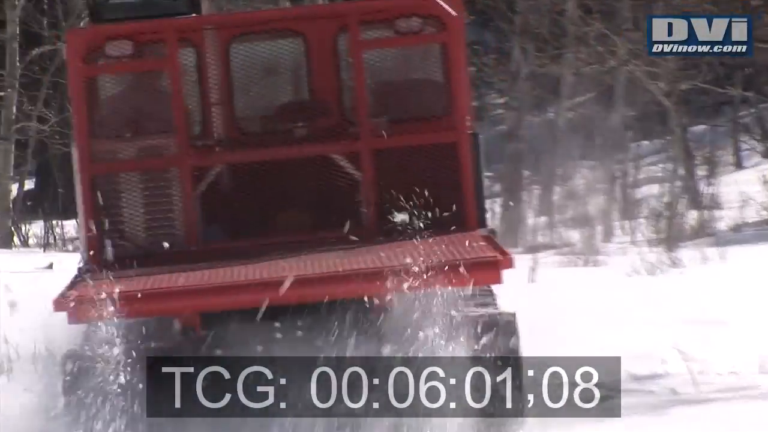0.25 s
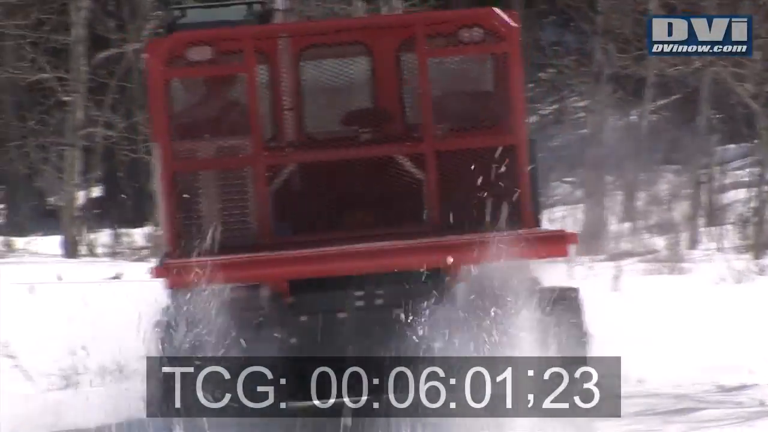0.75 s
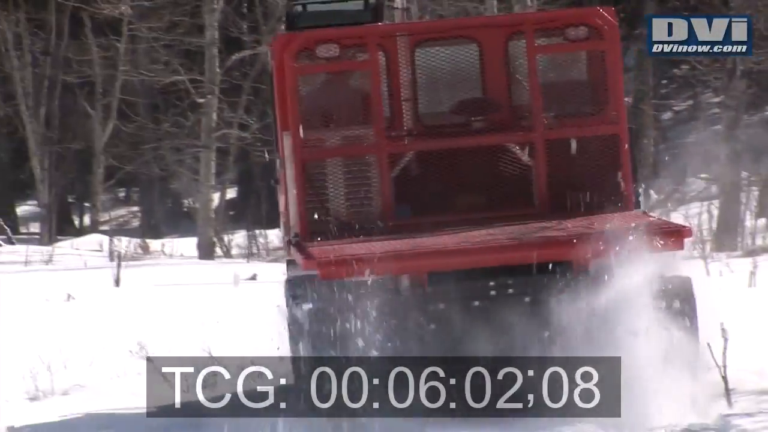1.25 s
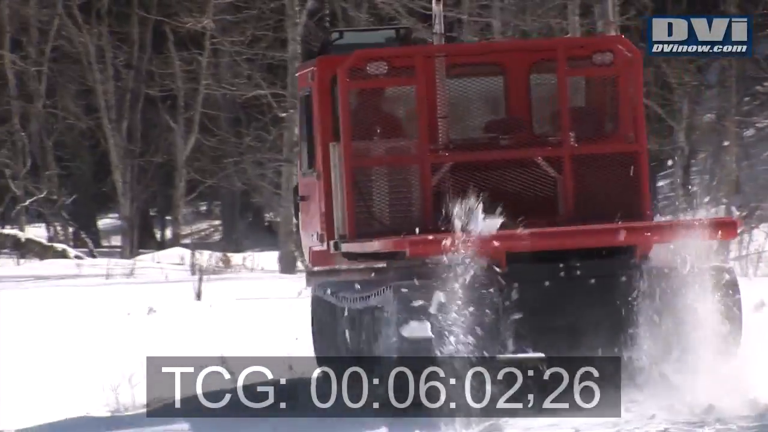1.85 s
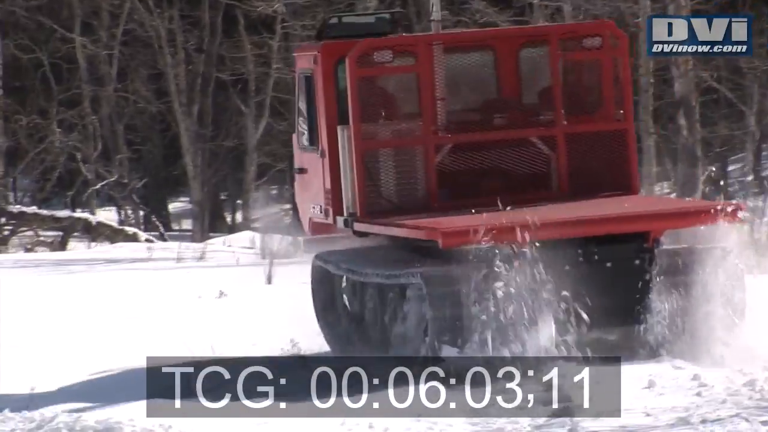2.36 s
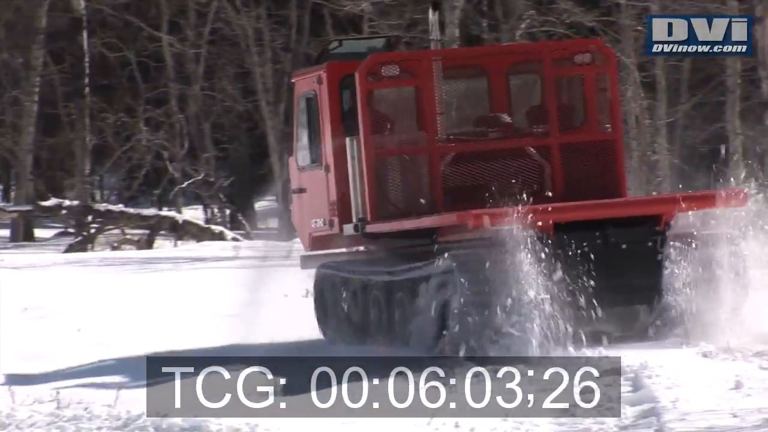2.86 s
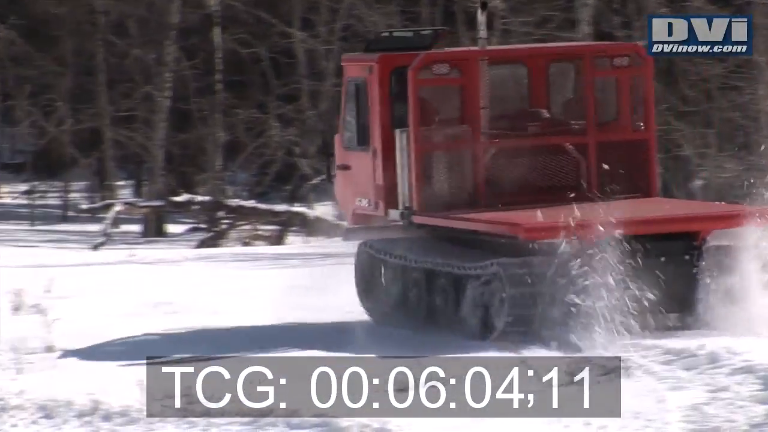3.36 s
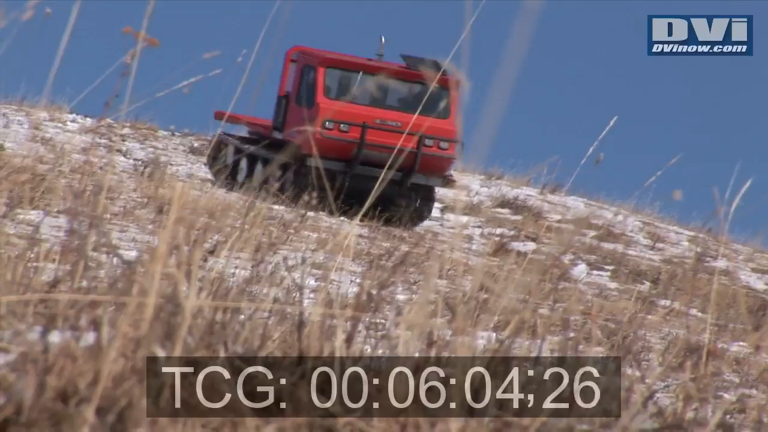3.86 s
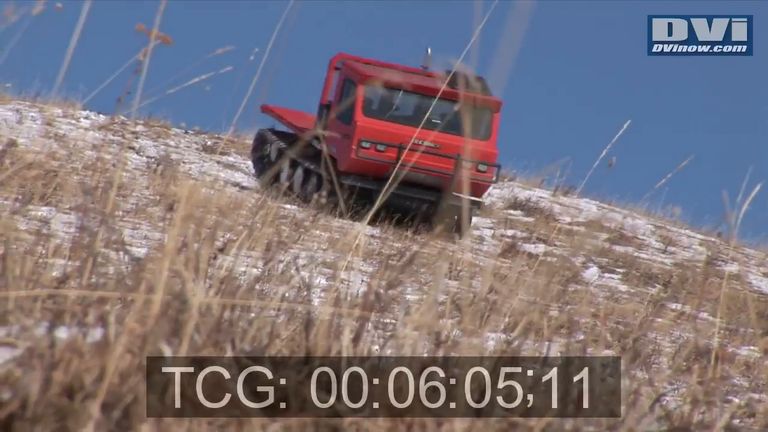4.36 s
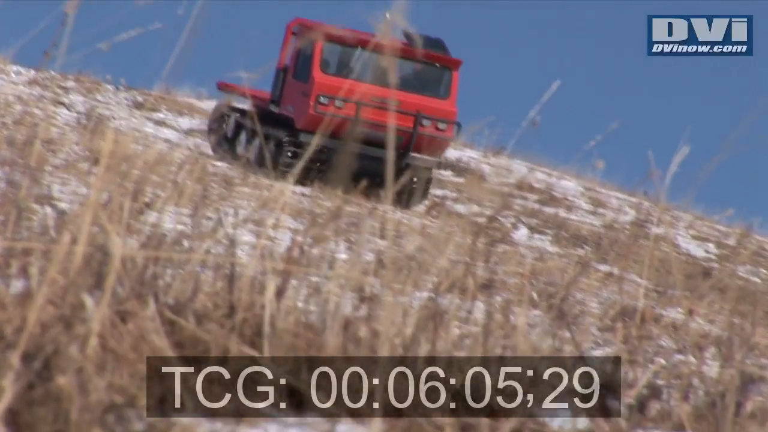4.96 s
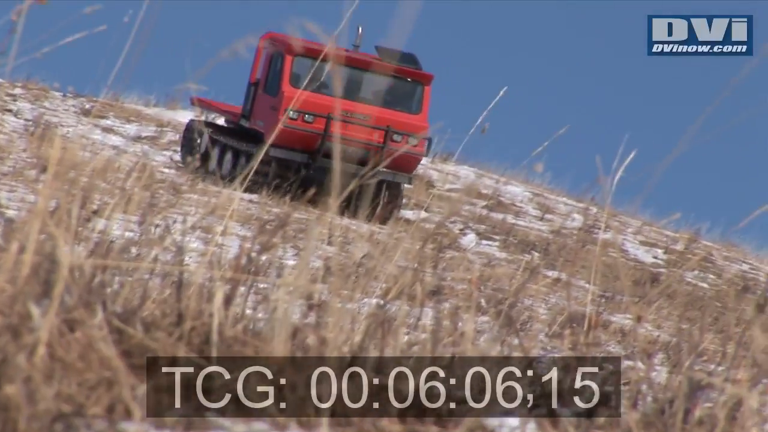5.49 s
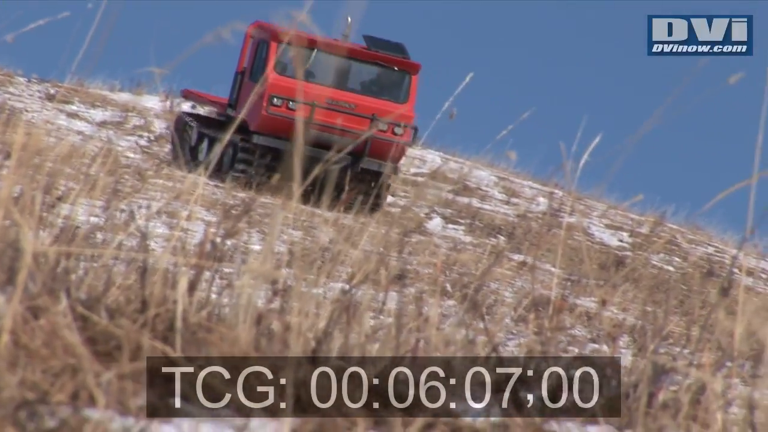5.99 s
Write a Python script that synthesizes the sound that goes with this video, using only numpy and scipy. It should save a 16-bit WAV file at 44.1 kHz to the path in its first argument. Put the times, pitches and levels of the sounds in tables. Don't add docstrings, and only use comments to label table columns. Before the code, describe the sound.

Grinding snow, throbbing low exhaust and rattling deck panels fill the near view, suddenly replaced by windy hillside air and a soft far-off engine.

```python
import sys
import numpy as np
from scipy import signal
from scipy.fft import rfft, irfft, next_fast_len
from scipy.io import wavfile
from scipy.ndimage import uniform_filter1d, map_coordinates

SR = 44100
rng = np.random.default_rng(int(sys.argv[2]) if len(sys.argv) > 2 else 0)


def unload_wav(signal):
    wavfile.write(
        sys.argv[1],
        SR,
        np.round(np.clip(np.atleast_2d(signal).T, -1, 1) * 32767).astype(np.int16),
    )


def ratio(d):
    e = np.asarray(d, float) / 20
    return 10 ** e


N = 274743
TIME = np.arange(N) / SR
CUT_S, SPLICE_S = 3.8392, 0.0008

# (frequency [Hz], density [dB per Hz])
HISS_SPECTRUM = [(200, -7), (400, -3), (1000, -3), (2000, -12.5), (2500, -35), (3700, -39), (4200, -17),
                 (7000, -22), (14400, -23.5), (14900, -24), (15600, -36)]
# (multiple of drum rate, level [dB])
DRUM_WHINE = [(4, -93), (8, -74.5), (9, -75.5), (10, -90), (14, -89), (15, -101), (16, -79), (17, -84),
              (18, -105), (19, -94), (20, -102), (21, -101), (22, -102)]
# (frequency [Hz], gain [dB])
MIC_RESPONSE = [(14800, 0), (15050, -30), (16000, -32)]

# (frequency [Hz], density [dB per Hz])
WIND_SPECTRUM = [(13, -52), (22, -17), (54, -6.5), (86, 1), (118, 0.5), (146, -6), (163, 2), (200, -9),
                 (300, -32), (390, -29), (660, -120)]
# (frequency [Hz], density [dB per Hz])
WIND_EDGE_SPECTRUM = [(190, -17), (240, 8.5), (350, -1.5), (500, -13), (700, -52)]
# (frequency [Hz], density [dB per Hz])
FAR_TRACK_SPECTRUM = [(500, -23), (860, -14), (1200, -9), (1420, -12), (1560, -4), (1800, -7), (2150, -0.5),
                      (2550, -5.5), (3100, -5.5), (3400, -15.5), (3950, -19.5), (4350, -40), (4900, -27),
                      (5600, -48)]
# (frequency [Hz], side minus mid [dB])
FAR_WIDTH = [(30, -11), (60, -15), (110, -17), (200, -21), (380, -29), (700, -28), (1300, -28), (2400, -53),
             (4400, -46), (13000, -2)]
# (time [s], level [dB])
FAR_EFFORT = [(3.86, -59), (4.11, -57.5), (4.26, -59), (4.38, -57), (4.62, -58.5), (5.24, -62), (5.56, -58),
              (5.87, -56.5), (6.14, -61), (6.23, -58)]
# (time [s], rise [dB], length [s])
GUST_EVENTS = [
    (4.08, -5, 0.026),
    (4.22, 1.5, 0.19),
    (4.5, -2, 0.049),
    (4.8, -4, 0.041),
    (4.92, 2.5, 0.03),
    (5.05, 0, 0.021),
    (5.32, -4, 0.038),
    (5.45, 1.5, 0.1),
]
# (time [s], rise [dB], length [s])
FLURRY_EVENTS = [
    (3.95, -9, 0.15),
    (4.4, 2.5, 0.08),
    (4.7, 7, 0.22),
    (5.65, 1, 0.08),
]
# (time [s], rise [dB], length [s])
DRONE_SWELLS = [
    (4.05, 6, 0.039),
    (4.62, 12.5, 0.041),
    (5.21, 7.5, 0.04),
    (5.45, 2.5, 0.051),
    (5.98, 7, 0.061),
]
# (time [s], level [dB], length [s])
FAR_SQUEAKS = [
    (5.549, -84, 0.014),
    (5.587, -77, .004),
    (5.603, -78, .012),
]

# (frequency [Hz], side minus mid [dB])
NEAR_WIDTH = [(30, -24), (110, -53), (380, -17.5), (800, -13.5), (2400, -21.5), (3000, -43), (3500, -29.5),
              (4400, -4.5), (5000, -9.5), (6000, 1), (9200, -3.5), (9700, -12), (11700, -22), (13000, -3.5)]
# (frequency [Hz], density [dB per Hz])
HULL_SPECTRUM = [(13, -50), (22, -25), (34, -34), (44, -14), (60, -9.5), (72, -5.5), (115, -3), (160, -6),
                 (195, -11), (220, -18.5), (260, -26), (400, -57.5)]
# (time [s], rise [dB], length [s])
HULL_LURCHES = [
    (0.23, 5, 0.038),
    (0.65, 6, 0.05),
    (0.82, 8.5, 0.095),
    (1.1, 4, 0.061),
    (1.57, -2, 0.045),
    (2.3, 7, 0.12),
    (2.6, 7, 0.047),
    (3.45, 4, 0.11),
    (3.75, 2, 0.088),
]
# (frequency [Hz], time [s], level [dB], length [s])
HULL_HUMS = [
    (155, 0.33, -41.5, 0.54),
    (127.4, 3.12, -46, 0.35),
    (159, 1.65, -46, 0.18),
    (158, 2.03, -42, 0.045),
]
# (time [s], rate [Hz], level [dB])
EXHAUST_FIRING = [(0.0, 79.4, -42.5), (0.16, 79, -25.5), (0.19, 78, -44), (0.21, 77, -29),
                  (0.38, 76.2, -44), (0.47, 79.3, -44), (0.59, 78.5, -35), (0.95, 81.4, -37.5),
                  (0.98, 80.5, -57), (1.07, 81.4, -34), (1.11, 82.65, -40.5), (1.83, 78.1, -36),
                  (2.37, 79.1, -36.5), (2.49, 78.5, -41.5), (2.85, 78.5, -35.5), (3.06, 79.7, -39),
                  (3.73, 80, -42), (3.82, 81, -51)]
MISFIRES = [0.06, 0.67, 0.74, 0.86, 1.04, 1.3, 1.95, 2.0, 2.08, 2.2, 2.44, 2.51, 2.76, 3.2, 3.46, 3.63]
# (frequency [Hz], level [dB])
GEAR_TONES = [(592, -60.5), (734, -57), (964, -62), (1228, -57), (1880, -54.5)]
# (time [s], rise [dB], length [s])
PANEL_SHAKES = [
    (0.05, -5, 0.13),
    (0.32, -2, 0.06),
    (0.97, 4, 0.054),
    (1.33, -8, 0.1),
    (1.83, 10, 0.062),
    (2.15, -1, 0.08),
    (2.4, 8.5, 0.15),
    (2.9, 8, 0.25),
    (3.25, 8, 0.11),
    (3.75, 10, 0.11),
]
# (time [s], frequency [Hz], level [dB])
ROLLER_SQUEAL = [(0, 13100, -67), (0.6, 12900, -68), (1.0, 12600, -75), (1.28, 12200, -74),
                 (1.45, 11900, -73), (1.95, 12500, -78), (2.1, 12650, -70), (2.5, 12450, -71.5),
                 (2.85, 12560, -69), (2.95, 12950, -71), (3.2, 13000, -73), (3.6, 12940, -72),
                 (3.7, 12800, -79), (3.84, 12700, -90)]
# (time [s], rise [dB], length [s])
ROLLER_BINDS = [
    (0.39, 5, 0.03),
    (0.59, 6, 0.03),
    (2.18, 6, 0.054),
    (2.38, 10, 0.04),
    (2.71, 8, 0.03),
    (2.8, 6, 0.033),
    (3.17, 10, 0.04),
    (3.43, 3, 0.049),
    (3.65, 7, 0.06),
]
# (time [s], peak [dB], frequency [Hz])
ICE_CHIPS = [
    (0.5923, -49, 13200),
    (0.6429, -53, 12800),
    (1.0021, -58, 12470),
    (2.1822, -52, 12600),
    (2.3648, -58, 12500),
    (2.7459, -53, 12600),
    (2.816, -46, 12530),
    (3.4533, -64, 12640),
]
# (time [s], level [dB])
DIG_EFFORT = [(0, -35), (0.29, -34), (0.56, -36), (0.96, -34.5), (1.14, -38), (1.62, -37), (2.21, -39),
              (2.25, -36.5), (2.66, -35.5), (3.01, -38), (3.29, -41.2), (3.52, -37.5), (3.64, -39.5),
              (3.84, -38.6)]
# (time [s], rise [dB], length [s])
SNOW_DEPTH = [
    (0.1, 0, 0.23),
    (0.7, 0, 0.1),
    (0.835, 3, 0.019),
    (1.3, -0.5, 0.2),
    (1.95, 0, 0.23),
    (3.6, -1.65, 0.7),
]
# (frequency [Hz], density [dB per Hz])
CHURN_SPECTRUM = [(170, -38), (230, -5), (440, -1.5), (720, -2.5), (800, -4), (950, -1), (1310, -5.5),
                  (1500, -1), (1750, -3), (1950, -12), (2200, -49.5)]
# (frequency [Hz], density [dB per Hz])
CRUNCH_SPECTRUM = [(1600, -54), (1800, -12.5), (1950, 0), (2400, -1.5), (2900, 0.5), (3300, -2.5),
                   (3750, -3), (3900, -8.5), (4150, -15), (4500, -26.5), (4900, -18), (5150, -21),
                   (5600, -34), (7000, -54)]
# (time [s], rise [dB], length [s])
CLEAT_BITES = [(0.07, 0, 0.03), (0.31, 4.5, 0.016), (0.48, 3, 0.012), (0.82, 2, 0.019), (0.89, -4, 0.021),
               (0.93, 1, 0.037), (1.27, 3, 0.018), (1.39, -2, 0.016), (1.65, 1, 0.03), (1.87, 2, 0.017),
               (2.27, 3.5, 0.038), (2.37, -3.5, 0.018), (2.41, 3, 0.02), (3.7, 3, 0.015)]
# (frequency [Hz], density [dB per Hz])
SPRAY_SPECTRUM = [(4500, -24), (5400, -5), (6200, -3.5), (7400, -11), (8300, -7), (8900, -12), (9700, -5),
                  (10400, -11), (10800, -9.5), (13500, -14), (14900, -16), (15700, -20)]
# (time [s], rise [dB], length [s])
SPRAY_PLUMES = [
    (0.2, 6, 0.3),
    (1.55, 2.5, 0.1),
    (2.1, 3, 0.24),
    (2.8, 5.5, 0.15),
]


def unit(x):
    return x / np.sqrt(np.mean(x ** 2) + 1e-20)


def along(points, hz):
    f, v = np.transpose(points)
    return np.interp(np.log(hz + 1), np.log(f + 1), v)


def curves(rows):
    s, *cols = np.transpose(rows)
    return [np.interp(TIME, s, c) for c in cols]


def bell(s, length):
    return np.exp(-((TIME - s) / length) ** 2)


def swells(rows):
    return sum(db * bell(s, length) for s, db, length in rows)


def wobble(rate):
    coarse = TIME[::32]
    knots = rng.standard_normal(int(N * rate / SR) + 4)
    return np.interp(TIME, coarse, map_coordinates(knots, [coarse * rate]))


def phase(hz):
    return 2 * np.pi * np.cumsum(hz) / SR


def filtered(x, response):
    m = next_fast_len(N + 8192)
    return irfft(rfft(x, m) * response(np.fft.rfftfreq(m, 1 / SR)), m)[..., :N]


def even(x, seconds):
    return x / np.sqrt(np.abs(uniform_filter1d(x.mean(0) ** 2, int(seconds * SR))) + 1e-3)


def rush(spectrum, width, patchy_db, grain_db=-40, grains=2000):
    specks = (rng.random((2, N)) < grains / SR) * rng.standard_normal((2, N))
    noise = rng.standard_normal((2, N)) + ratio(grain_db) * unit(specks)
    z = signal.stft(noise, nperseg=512)[2]
    field = uniform_filter1d(rng.standard_normal(z.shape[1:]), size=5, axis=0)
    field = uniform_filter1d(field, size=12, axis=1)
    pair = signal.istft(z * ratio(patchy_db * unit(field)), nperseg=512)[1][:, :N]
    mid, side = filtered(pair, lambda hz: ratio(along(spectrum, hz) + [0 * hz, along(width, hz)]))
    return np.array([mid + side, mid - side]) / mid.std()


def tone(hz, db, rough_hz, rough):
    turn = phase(hz) + rough * wobble(rough_hz)
    return np.sqrt(2) * ratio(db + 3.6 * rough * wobble(rough_hz)) * np.sin(turn)


def squeak(centre_hz, width_hz, side_db):
    slow = filtered(rng.standard_normal((4, N)), lambda hz: np.exp(-(hz / width_hz) ** 2))
    turn = phase(centre_hz + 0 * TIME)
    mid, side = slow[:2] * np.cos(turn) + slow[2:] * np.sin(turn)
    side = ratio(side_db) * side
    return np.array([mid + side, mid - side]) / mid.std()


def camera():
    hiss = ratio(-70.5) * rush(HISS_SPECTRUM, [(1000, 0.0026)], patchy_db=-1.0)
    drum_turn = 2 * np.pi * 299.7 * TIME
    whine = []
    for lean_db, skew in [(0.47, .31), (-0.38, .312)]:
        whine.append(sum(np.sqrt(2) * ratio(db + lean_db) * np.sin(k * drum_turn + k * k * skew)
                         for k, db in DRUM_WHINE))
    return hiss + whine


def wind(effort_db, usual_db):
    lump_db = -50.3 + swells(GUST_EVENTS) + 1.1 * wobble(18) + 0.48 * wobble(27)
    lumps = ratio(lump_db) * even(rush(WIND_SPECTRUM, FAR_WIDTH, patchy_db=0.0), seconds=.15)
    edge_db = usual_db - 14 + 2.1 * (effort_db - usual_db) + swells(FLURRY_EVENTS) + 2.0 * wobble(6.4)
    return lumps + ratio(edge_db) * rush(WIND_EDGE_SPECTRUM, FAR_WIDTH, patchy_db=-2.0)


def far_drone():
    rise = np.exp(-np.abs(TIME - CUT_S) / 0.56)
    hz = 148.5 - 12 * rise + 2.6 * wobble(5)
    return tone(hz, -55.5 + swells(DRONE_SWELLS), rough_hz=21.04, rough=1.0)


def far_tracks(effort_db):
    hiss = rush(FAR_TRACK_SPECTRUM, FAR_WIDTH, patchy_db=0.5, grain_db=-11.5, grains=700)
    swell = sum(ratio(db) * bell(s, length) for s, db, length in FAR_SQUEAKS)
    squeaks = swell * squeak(12700, width_hz=450, side_db=-8)
    return ratio(effort_db + 0.47 * wobble(26)) * hiss + squeaks


def far_hillside():
    effort_db, = curves(FAR_EFFORT)
    usual_db = np.mean(FAR_EFFORT, axis=0)[1]
    return wind(effort_db, usual_db) + far_drone() + far_tracks(effort_db)


def hull():
    mode_db = -40 - 2 * TIME + swells(HULL_LURCHES)
    mode = tone(102.5 + 2.3 * wobble(3.98), mode_db, rough_hz=21.88, rough=1.0)
    dent = lambda hz: 1 - 0.91 * np.exp(-((hz - 88) / 18) ** 2)
    rumble_db = -35 - 4 * TIME + 1.85 * wobble(3.86) + 0.9 * wobble(21.63)
    noise = filtered(rush(HULL_SPECTRUM, NEAR_WIDTH, patchy_db=1.5), dent)
    rumble = ratio(rumble_db) * even(noise, seconds=0.13)
    hums = sum(bell(s, length) * tone(hz + 1.43 * wobble(2.87), db, rough_hz=8.8, rough=0.23)
               for hz, s, db, length in HULL_HUMS)
    ground_spectrum = [(15, -40), (24, -10), (34, -0.5), (50, 2.5), (65, -41)]
    ground = ratio(-58) * rush(ground_spectrum, NEAR_WIDTH, patchy_db=1.5)
    return mode + hums + rumble + ground


def exhaust(firing_hz, firing_db):
    stumble_db = swells([(s, -12, 0.014) for s in MISFIRES])
    return tone(firing_hz, firing_db + stumble_db + 1.1 * wobble(30.22), rough_hz=18, rough=0.45)


def firing_throb(firing_hz):
    turn = phase(firing_hz)
    return 1 + 0.17 * np.cos(turn) + 0.11 * np.cos(2 * turn) + 0.081 * np.cos(turn / 5)


def follow_dig(db, share):
    dig_db, = curves(DIG_EFFORT)
    return dig_db.mean() + db + share * (dig_db - dig_db.mean())


def churn_level():
    return follow_dig(0.6, 0.65) + 0.55 * swells(CLEAT_BITES) + swells(SNOW_DEPTH)


def gears():
    load_db = churn_level() + 40.5
    return sum(tone(hz + 5 * wobble(3), db + load_db, rough_hz=35.26, rough=0.49) for hz, db in GEAR_TONES)


def panels():
    low_db = follow_dig(-17, 1.77) + swells(PANEL_SHAKES) + 3 * wobble(28)
    low_ring = squeak(1568 + 14 * wobble(1.5), width_hz=39, side_db=-15)
    high_db = follow_dig(-10, 1.77) + 1.7 * wobble(5.17)
    high_ring = squeak(2306 + 30 * wobble(1.4), width_hz=176, side_db=-48)
    return ratio(low_db) * even(low_ring, seconds=0.053) + ratio(high_db) * high_ring


def roller_squeal():
    hz, db = curves(ROLLER_SQUEAL)
    db = db + swells(ROLLER_BINDS) - 0.5 + 1.5 * wobble(40)
    return ratio(db) * squeak(hz, width_hz=340, side_db=-8)


def ice_chips():
    out, t = np.zeros(N + SR), np.arange(400) / SR
    for s, db, hz in ICE_CHIPS:
        decay = ratio(db + 1.0 - 60 * t / .012)
        jitter = .6 * rng.standard_normal(len(t))
        out[round(s * SR):][:len(t)] += decay * np.sin(2 * np.pi * hz * t + jitter)
    return out[:N]


def tracked_snow(throb):
    bounce = lambda hz: 1 - 0.15 * np.exp(-hz / 2500 - 2j * np.pi * hz * .0077)
    churn = rush(CHURN_SPECTRUM, NEAR_WIDTH, patchy_db=0.06, grain_db=-10.0, grains=1600)
    churn = ratio(churn_level() - 0.65) * filtered(churn, bounce)
    crunch_db = follow_dig(-0.4, 1) + swells(CLEAT_BITES) + 0.4 * wobble(14)
    crunch = ratio(crunch_db) * rush(CRUNCH_SPECTRUM, NEAR_WIDTH, patchy_db=0.62, grain_db=-12, grains=1700)
    spray_db = follow_dig(-29, 0.48) + swells(SPRAY_PLUMES) + 0.37 * wobble(11)
    spray = ratio(spray_db) * rush(SPRAY_SPECTRUM, NEAR_WIDTH, patchy_db=1.0, grain_db=-26, grains=300)
    uneven_db = 0.041 * wobble(9.15) + 0.14 * wobble(22.77) + 0.78 * wobble(70)
    return ratio(uneven_db) * (churn + crunch + throb * spray)


def near_carrier():
    firing_hz, firing_db = curves(EXHAUST_FIRING)
    throb = firing_throb(firing_hz)
    low = exhaust(firing_hz, firing_db) + hull()
    running_gear = gears() + panels() + tracked_snow(throb) + throb * roller_squeal() + ice_chips()
    return low + ratio([[-.15], [.15]]) * running_gear


def scene():
    click = ratio(-57) * (np.arange(N) == round(CUT_S * SR))
    far = np.clip((TIME - CUT_S) / SPLICE_S + 1, 0, 1)
    return (1 - far) * near_carrier() + far * far_hillside() + click + camera()


def top_cut(x):
    return signal.sosfilt(signal.butter(12, 15620, fs=SR, output="sos"), x)


def record(dry):
    mix = filtered(dry, lambda hz: ratio(along(MIC_RESPONSE, hz)))
    return top_cut(mix)


dry = scene()
out = record(dry)
unload_wav(out)
```